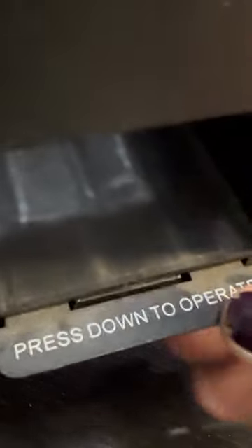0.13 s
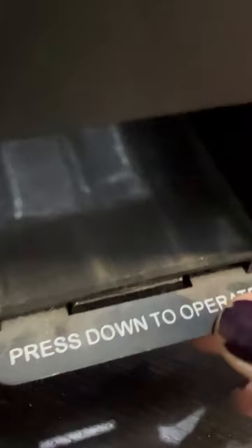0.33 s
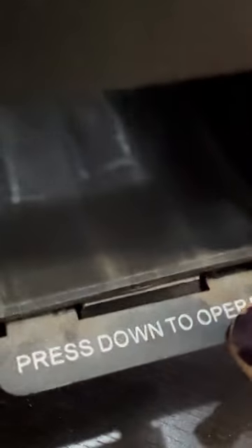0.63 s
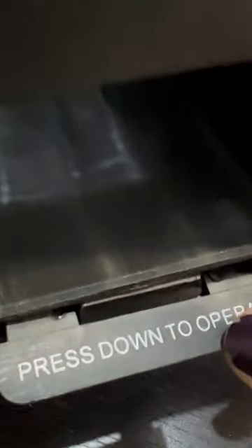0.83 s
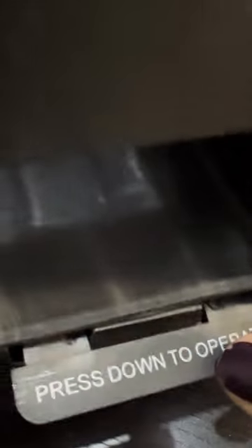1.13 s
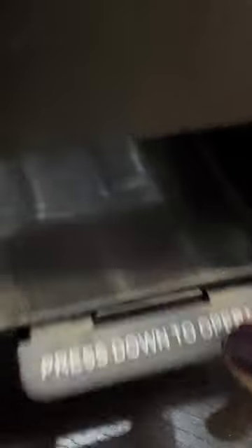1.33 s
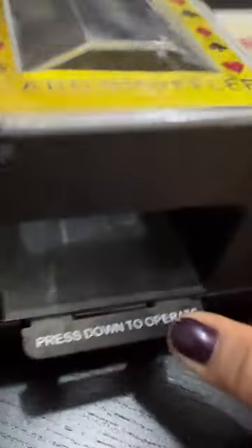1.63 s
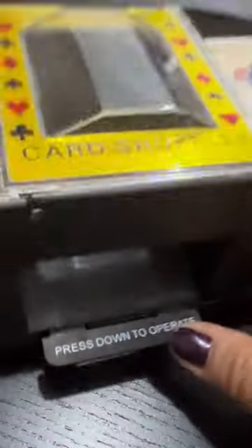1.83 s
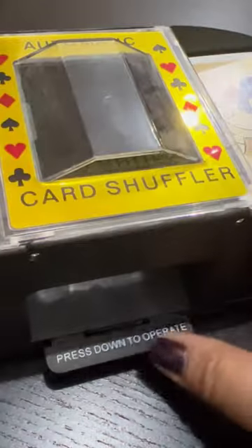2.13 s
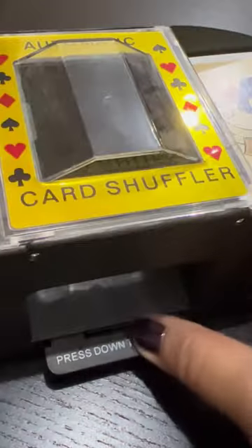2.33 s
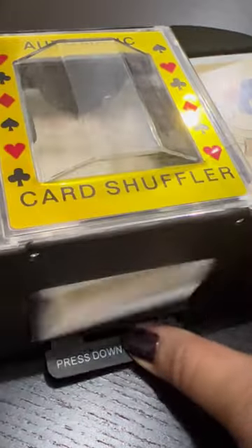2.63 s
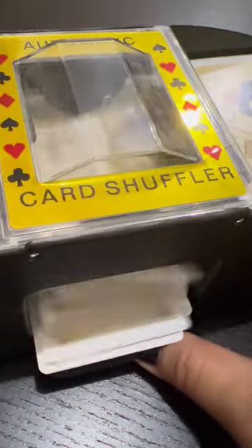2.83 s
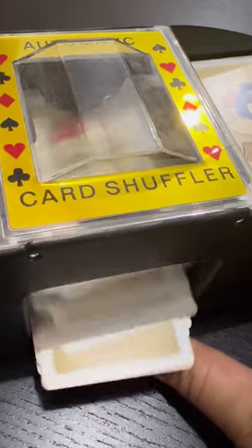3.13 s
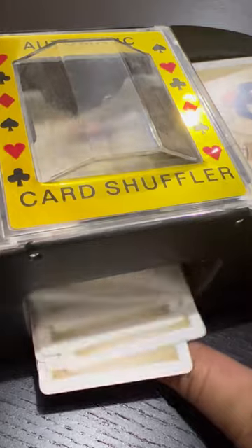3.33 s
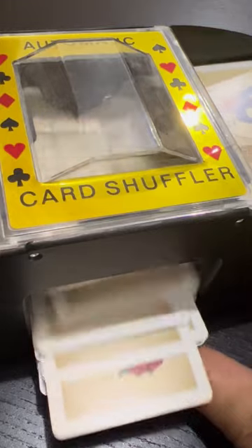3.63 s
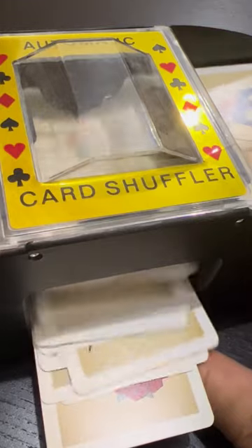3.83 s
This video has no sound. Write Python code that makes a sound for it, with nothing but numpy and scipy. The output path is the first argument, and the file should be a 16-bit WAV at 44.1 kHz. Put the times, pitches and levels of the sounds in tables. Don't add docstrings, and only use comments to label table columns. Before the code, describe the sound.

A small plastic card shuffler whirs and rattles, slapping out cards, after fingernail taps and hard knocks

```python
import sys
import numpy as np
from scipy import signal
from scipy.fft import rfft, irfft
from scipy.io import wavfile
from scipy.ndimage import uniform_filter1d

SR = 44100
rng = np.random.default_rng(int(sys.argv[2]) if len(sys.argv) > 2 else 0)


def volts_from_decibels(level):
    exponent = np.asarray(level, float) / 20
    return 10 ** exponent


def int16_out(signal):
    q = np.round(np.clip(np.atleast_2d(signal).T, -1, 1) * 32767)
    wavfile.write(sys.argv[1], SR, q.astype(np.int16))


N = 176400
T = np.arange(N) / SR
LEFT_RIGHT = np.array([[1], [-1]])
PATCH_PER_S = 25
CARD_FALL_S = 0.0016
# (frequency [Hz], level [dB])
SLAP = [(300, -20), (2000, 5), (4500, 6), (8000, 3), (10500, -3.5), (14000, -0.5)]


def level(x, db):
    return x * volts_from_decibels(db) / np.sqrt(np.mean(x ** 2) + 1e-18)


def peak(x, db):
    return x * volts_from_decibels(db) / (np.abs(x).max() + 1e-18)


def curve(rows):
    return volts_from_decibels(np.interp(T, *np.array(rows).T))


def colour(x, rows):
    hz, db = np.array(rows).T
    f = np.arange(N // 2 + 1) * SR / N + 1
    return irfft(rfft(x) * volts_from_decibels(np.interp(np.log(f), np.log(hz), db)), N)


def band(x, hz, width):
    hz = min(hz, .45 * SR)
    return signal.lfilter(*signal.iirpeak(hz, hz / width, SR), x + 1e-18)


def steep_band(x, hz, width):
    return band(band(x, hz, width), hz, width)


def walk(rate):
    hold = int(SR / rate)
    steps = np.repeat(rng.standard_normal(N // hold + 1), hold)
    return 1.5 * uniform_filter1d(uniform_filter1d(steps, hold), hold)[:N]


def swell(at, rise, fall):
    u = T - at - rise
    return np.exp(np.maximum(np.where(u < 0, u / rise, -u / fall), -40))


def ring(x, modes):
    out = 0
    for hz, db, t60 in modes:
        width = np.log(1000) / np.pi / t60
        out = out + volts_from_decibels(db) * band(x, hz, width) * np.sqrt(t60 * 400)
    return out


def patchy(rows, spread_db, rate):
    out = 0
    for hz in np.arange(200, 16200, 450.):
        flicker = volts_from_decibels(spread_db * np.minimum(walk(rate), .5))
        out = out + band(rng.standard_normal(N), hz, 236.0) * flicker
    return colour(out, rows)


def room_hum():
    # (frequency [Hz], level [dB])
    room = [(24, -54), (40, -7), (275, -4.5), (635, -16.5), (727, -17), (3100, -26.5), (6000, -44),
            (10000, -57), (15500, -60)]
    return level(colour(rng.standard_normal(N) * volts_from_decibels(1.14 * walk(15.0)), room), -51.5)


def phone_grip():
    # (time [s], level [dB])
    grip = [(0, -59), (.4, -57.5), (1.1, -56), (1.22, -46.5), (1.35, -63), (1.55, -51), (1.9, -57),
            (2.3, -63), (2.55, -63), (2.62, -29.5), (2.75, -63)]
    return level(steep_band(rng.standard_normal(N), 48.0, 45.0), 0) * curve(grip)


def nail_taps():
    # (time [s], level [dB], ring frequency [Hz], tick relative level [dB], tick frequency [Hz])
    taps = [(0.002, -35.5, 516, -5.5, 4040), (0.019, -43, 500, -12, 2950), (0.041, -35, 520, -7.5, 4000),
            (0.081, -36.5, 490, -9, 2000), (0.147, -41, 484, -15, 1500), (0.182, -39, 960, 9.5, 3060),
            (0.237, -53, 910, 2, 7940), (0.377, -37, 483, -28, 1500), (0.554, -27, 765, 4, 3000),
            (0.611, -40.5, 560, -1, 1200), (0.629, -35.5, 525, 4.5, 2160), (0.668, -29, 470, -9, 3040),
            (0.758, -35.5, 447, -10, 3370), (0.888, -34, 485, -11, 890), (1.013, -31.5, 724, -15, 2500),
            (1.022, -28.5, 520, -19, 790), (1.156, -30, 497, -12, 900), (1.186, -35.5, 750, -6, 2300),
            (1.195, -33, 483, -20, 900), (1.221, -30, 490, -15.5, 2010), (1.288, -36, 480, -28, 900),
            (1.337, -37.5, 540, 0.5, 2180), (1.361, -37, 500, -17, 9000), (1.389, -36, 910, -8, 2500),
            (1.427, -40.5, 455, 7.5, 5360), (1.604, -48, 600, 14, 13500), (1.64, -44.5, 900, 15, 6000),
            (1.655, -49, 1110, 8, 3000), (1.731, -32, 450, -12, 900), (1.82, -40.5, 464, 6.5, 2500),
            (1.879, -27.5, 810, 6, 4360), (2.264, -47, 537, 8.5, 3020), (2.338, -53.5, 439, 15.5, 4000)]
    # (frequency [Hz], level [dB], t60 [s])
    tick_modes = [(2165, 9.5, 0.018), (2730, -7, 0.028), (3570, -6, 0.036), (4330, -8.5, 0.022),
                  (6880, 7, .03), (8260, 7, .025)]
    body, contact = rng.standard_normal((2, N))
    nail = level(contact, 9) + level(ring(contact, tick_modes), 0)
    out = 0
    for at, db, hz, tick_db, tick_hz in taps:
        tap = steep_band(body * swell(at, 0.00089, 0.0079), hz, 265.0)
        tick = steep_band(nail * swell(at, 0.0007, 0.0043), tick_hz, 1.5 * tick_hz)
        out = out + peak(tap, db) + peak(tick, db + tick_db)
    return out


def hand_rub():
    # (time [s], level [dB])
    rub = [(.08, -66), (.2, -103), (.66, -69.5), (.95, -90), (1.03, -63), (1.09, -85), (1.2, -62.5),
           (1.3, -83), (1.42, -56.5), (1.66, -54.5), (1.86, -53.5), (1.9, -74), (2.05, -62), (2.15, -76),
           (2.22, -61), (2.35, -57.5), (2.4, -70.5)]
    # (frequency [Hz], level [dB])
    rub_colour = [(500, 18), (2200, 7), (7500, 11.5), (10500, 1), (13500, 10)]
    return level(patchy(rub_colour, 7, PATCH_PER_S), 4.5) * curve(rub) * (T < 2.6)


def skin_squeaks():
    # (time [s], level [dB], ring frequency [Hz])
    squeaks = [
        (1.368, -36, 13900),
        (1.392, -32.5, 14100),
        (1.654, -26.5, 15000),
        (1.73, -35, 13900),
        (2.175, -50, 14100),
        (2.43, -47, 14000),
    ]
    skin = rng.standard_normal(N)
    out = 0
    for at, db, hz in squeaks:
        out = out + peak(steep_band(skin * swell(at, 0.0013, 0.0058), hz, 500.0), db)
    return out


def contact_tick():
    return colour(rng.standard_normal(N), [(300, -28), (900, 7.5), (2500, 2), (7000, -10.5), (15000, -23)])


def lever_snaps(tick):
    # (time [s], level [dB])
    snaps = [
        (1.46, -24),
        (1.466, -10.5),
        (1.469, -23.5),
        (1.482, -36),
    ]
    # (frequency [Hz], level [dB], t60 [s])
    snap_modes = [(330, -2.5, 0.0066), (772, -2, 0.011), (970, 5, 0.033), (1150, -15, 0.017),
                  (1600, -18, .02), (2300, -27, 0.025), (3500, -28, 0.039), (4950, -27, 0.036),
                  (6790, -7.5, 0.057)]
    spring = rng.standard_normal(N)
    out = 0
    for at, db in snaps:
        out = out + peak(ring(spring * swell(at, 0.0018, 0.0057), snap_modes), db)
        out = out + peak(tick * swell(at, 0.0051, .003), db - 10.5)
    return out


def case_knocks(tick):
    # (time [s], level [dB], crack relative level [dB], thump relative level [dB], contact time [s])
    knocks = [
        (1.921, -5, -2, -24, 0.0039),
        (1.937, 0.5, -5, -20.5, 0.0044),
        (1.944, -3, -43, -14, 0.0069),
        (1.958, -10, -11.5, -13, 0.016),
        (2.012, -12, -2, -33, 0.008),
        (2.017, 2, -52, -24, 0.00089),
        (2.059, -35, -18, -1, 0.025),
    ]
    # (frequency [Hz], level [dB], t60 [s])
    knock_modes = [(338, -10, 0.011), (462, 2.5, 0.036), (620, -6, 0.011), (890, -7.5, 0.026),
                   (1405, -2.5, 0.015), (1820, -17, 0.015)]
    rough = rng.standard_normal(N)
    out = 0
    for at, db, crack_db, thump_db, touch in knocks:
        push = np.exp(-((T - at - touch / 4) / 0.00032) ** 2)
        push = push + 0.29 * rough * swell(at, 0.00025, touch)
        out = out + peak(ring(push, knock_modes), db)
        out = out + peak(tick * swell(at, 0.00012, 1.6 * touch), db + crack_db)
        out = out + peak(band(band(push, 81.0, 51.0), 81.0, 90.), db + thump_db)
    return out


def table_ring():
    # (frequency [Hz], level [dB], t60 [s])
    table_modes = [(102, -26.5, 0.25), (151, -27.5, 0.37), (360, -29, .35), (414, -35, 0.29),
                   (587, -41.5, 0.33)]
    out = 0
    for hz, db, t60 in table_modes:
        decay = swell(2.02, 0.0026, t60 / np.log(1000))
        out = out + volts_from_decibels(db + 3.2 * walk(29.75)) * decay * np.sin(2 * np.pi * hz * T)
    return out


def case(x):
    # (frequency [Hz], width [Hz], level [dB])
    panels = [(450, 96, 0), (780, 93, -2.5), (934, 136, -2), (1264, 112, 0), (1550, 163, -1.5),
              (2490, 186, -2), (3610, 440, -14.5)]
    out = 0
    for k, (hz, width, db) in enumerate(panels):
        press = volts_from_decibels(1.6 * walk(45))
        out = out + (-1) ** k * volts_from_decibels(db) * band(x * press, hz, width)
    return out


def motor():
    # (time [s], level [dB])
    motor_load = [
        (2.515, -54.5),
        (2.545, -19),
        (2.565, -10),
        (2.61, -16.5),
        (2.66, -21.5),
        (3.6, -24),
        (4, -25.5),
    ]
    # (frequency [Hz], level [dB])
    slide = [(24, -52), (60, -38), (243, -25), (455, 9.5), (1240, -4.5), (2500, 0.5), (16000, -7)]
    gears_per_s, flicks_per_s, gear_flutter_db = 2000, 40, 1.5
    gear_size, flick_size = np.minimum(rng.exponential(size=(2, N)), 3.5)

    clicks = (rng.random(N) < gears_per_s / SR) * volts_from_decibels(4 * gear_size) * rng.choice([-1, 1], N)
    gears = level(case(clicks * volts_from_decibels(gear_flutter_db * walk(90))), 1.5)

    hiss = patchy(slide, 19.5, PATCH_PER_S) * volts_from_decibels(2 * walk(60))
    flick_hits = (rng.random(N) < flicks_per_s / SR) * volts_from_decibels(1.6 * flick_size)
    flicks = signal.lfilter([1], [1, -np.exp(-1 / (CARD_FALL_S * SR))], flick_hits)
    flicks = level(flicks * colour(rng.standard_normal(N), SLAP), -18)

    table = band(band(rng.standard_normal(N), 160.0, 160.0), 110.0, 150.0)
    table = level(table * volts_from_decibels(gear_flutter_db * walk(8.1)), -23)

    load = curve(motor_load) * (T > motor_load[0][0])
    sliding = level(hiss, -5.5) + flicks
    return (gears + table) * load + sliding * np.minimum(load, volts_from_decibels(-18))


def cards():
    # (time [s], level [dB], case thud relative level [dB], thud frequency [Hz])
    cards_early = [(2.545, -25, 20, 830), (2.565, -12.5, 10, 620), (2.6134, -4, 0, 800),
                   (2.637, -7, 10, 420), (2.6543, -2.5, 3, 800), (2.668, -6.5, 6, 700),
                   (2.7164, -11.5, 6, 900), (2.729, -12, 14, 1250), (2.7372, -18, 9, 1000),
                   (2.765, -5.5, -1, 1000), (2.781, -10.5, 2, 1500), (2.8477, -12.5, 18.5, 1330),
                   (2.863, -5, 8.5, 1210), (2.877, -9.5, 9, 1500), (2.9057, -8, -3, 950),
                   (2.953, -7, -9, 436), (3.005, -1.5, -12, 2300), (3.0335, -8.5, 9.5, 440),
                   (3.066, -18.5, 16.5, 432), (3.0788, -2.5, 8, 1200), (3.1, -28, -9, 1000),
                   (3.117, -4.5, 5, 930), (3.13, -9.5, 7, 2500), (3.1392, -9.5, 9, 2530),
                   (3.152, -18, 10, 1500), (3.2, -16, 11.5, 1080), (3.2152, -10.5, 13, 1500),
                   (3.233, -12.5, 7, 2550), (3.252, -11.5, 14, 1050), (3.275, -8, 12, 1180)]
    cards_late = [(3.348, -20, 12, 1500), (3.361, -13, 6, 1490), (3.404, -18, 15, 1310),
                  (3.4264, -10.5, -1, 1200), (3.4375, -7.5, 13, 982), (3.473, -15, 17, 1550),
                  (3.5493, -8.5, 15, 1210), (3.566, -12.5, 13.5, 1290), (3.5817, -4, -5, 1000),
                  (3.624, -20, 12, 514), (3.645, -7, 12.5, 1240), (3.662, -8, 6, 2500),
                  (3.672, -16.5, 16, 1200), (3.69, -12, 10, 1250), (3.712, -7.5, 7, 1010),
                  (3.7576, -4, -5, 2600), (3.7803, -4.5, -1, 1620), (3.8171, -6, 1.5, 1550),
                  (3.8796, -8, 10, 1270), (3.92, -20.5, 17, 1220), (3.9398, -13.5, -4, 1000),
                  (3.9944, -7.5, -5, 1000)]
    rise_s, tail_s, tail_db = 0.0012, 0.018, -13.5
    card_db, pan_db, ring_db = -12.5, 7, 2.5
    rows = np.array(list(cards_early) + list(cards_late))
    edge_noise, case_noise = rng.standard_normal((2, N))
    slap = level(colour(edge_noise, SLAP), 0)
    out, thud = 0, 0
    for (at, db, thud_db, thud_hz), (pitch, place) in zip(rows, rng.random((len(rows), 2))):
        env = np.minimum(2.0 * swell(at, rise_s, CARD_FALL_S), 1)
        env = env + volts_from_decibels(tail_db) * swell(at, 3 * rise_s, tail_s)
        burst = env * slap
        hit = burst + volts_from_decibels(ring_db) * band(burst, 3200 + 5000 * pitch, 730.0)
        pan = pan_db * (2 * place - 1) * LEFT_RIGHT
        out = out + volts_from_decibels(db + card_db + pan) * hit
        thud = thud + volts_from_decibels(db + thud_db) * env
        knock = band(np.diff(swell(at, 0.00019, .0003), prepend=0), thud_hz, 200)
        out = out + peak(knock, db + thud_db + card_db - 1.5)
    return out + volts_from_decibels(-6.5) * case(thud * case_noise)


def room_echo(both):
    u = np.arange(SR // 2) / SR
    tail = rng.standard_normal((2, len(u))) * volts_from_decibels(-60 * u / .3) * (u > .004)
    tail = tail[0] + .4 * tail[1] * LEFT_RIGHT
    tail = signal.lfilter(*signal.butter(1, 400, fs=SR), tail)
    tail = level(tail, -27) / np.sqrt(len(u))
    return signal.fftconvolve(both, tail, axes=1)[:, :N]


def port_difference(both):
    # (frequency [Hz], level [dB])
    side_db = [(150, -28), (500, -15.5), (2000, -12.5), (4000, -6), (8000, -8)]
    side = colour(np.roll(both.mean(axis=0), shift=12) * walk(90), side_db)
    return side * LEFT_RIGHT


def scene():
    tick = contact_tick()
    hand = nail_taps() + skin_squeaks() + lever_snaps(tick) + case_knocks(tick) + table_ring()
    both = hand + motor() + cards()
    both = both + room_echo(both) + room_hum() + phone_grip() + hand_rub()
    return both + port_difference(both)


def roll_off(x):
    return signal.sosfilt(signal.butter(12, 16680, fs=SR, output="sos"), x)


def record(dry):
    dry = signal.sosfilt(signal.butter(4, 42, "high", fs=SR, output="sos"), dry)
    rounded = np.tanh(1.1 * dry) / 1.1
    mix = signal.sosfilt(signal.ellip(8, .2, 40, 15900, fs=SR, output="sos"), rounded)
    return roll_off(mix)


dry = scene()
out = record(dry)
int16_out(out)
```